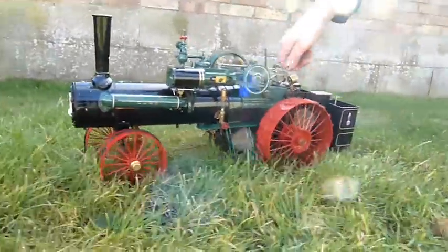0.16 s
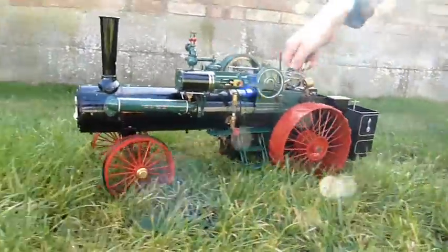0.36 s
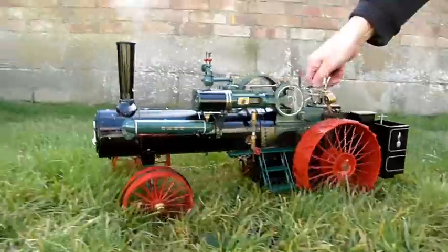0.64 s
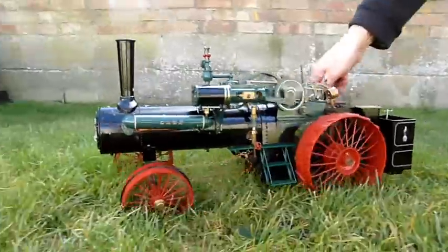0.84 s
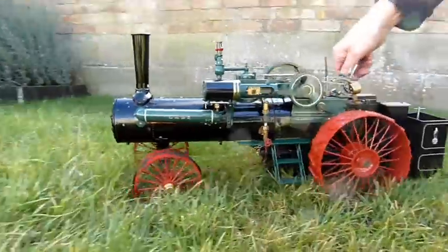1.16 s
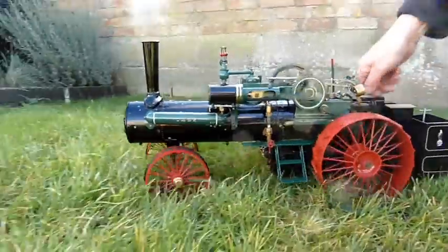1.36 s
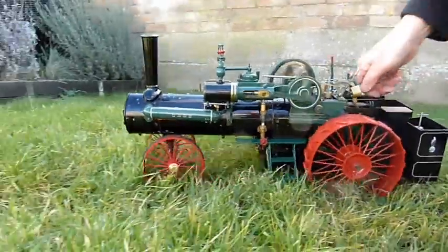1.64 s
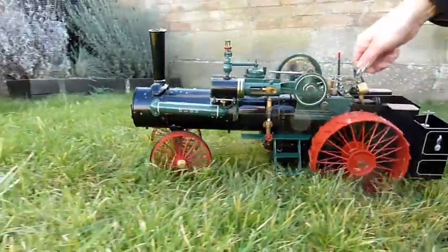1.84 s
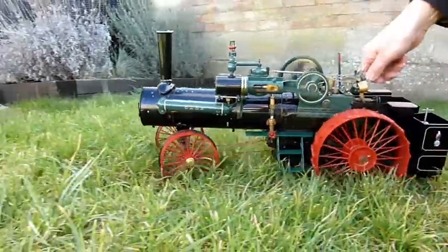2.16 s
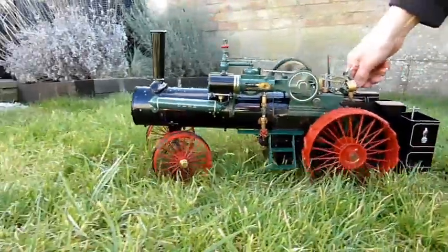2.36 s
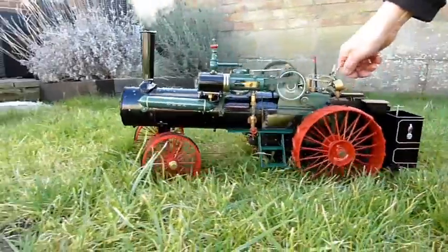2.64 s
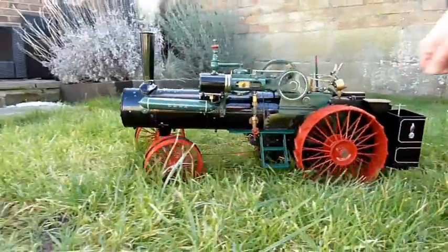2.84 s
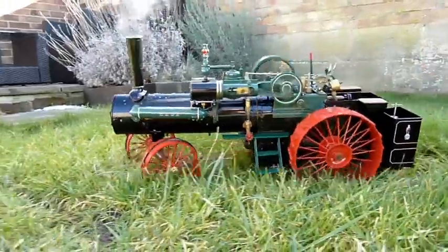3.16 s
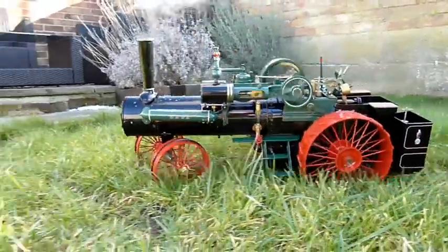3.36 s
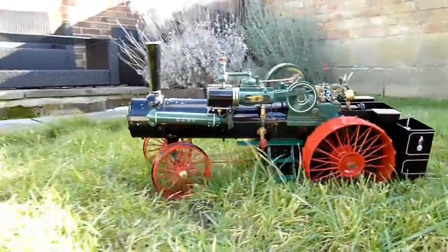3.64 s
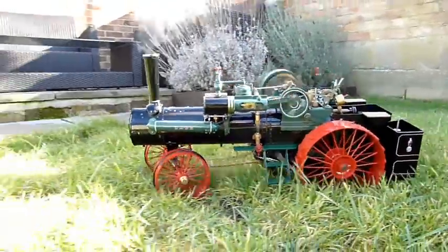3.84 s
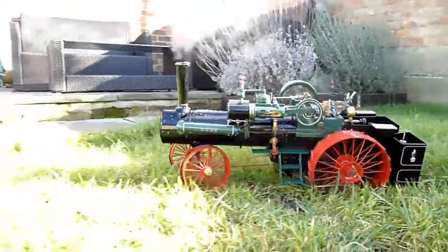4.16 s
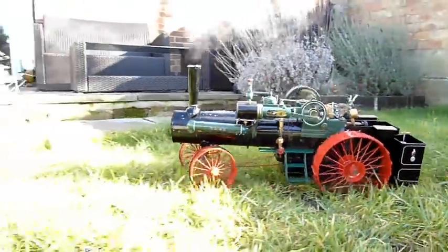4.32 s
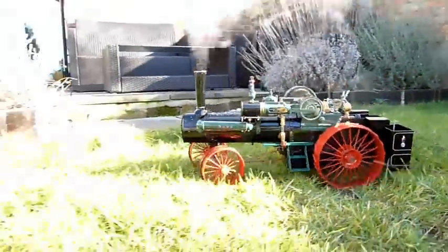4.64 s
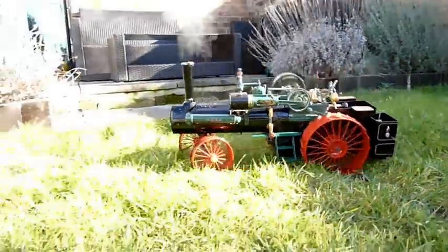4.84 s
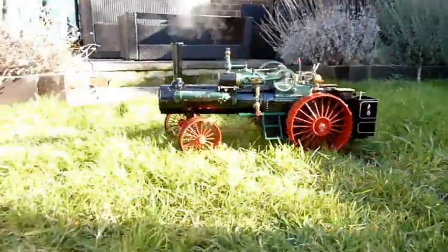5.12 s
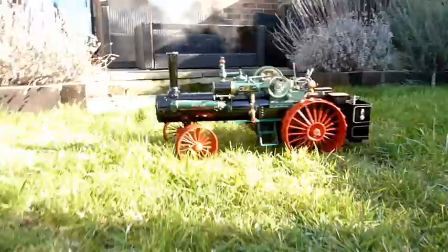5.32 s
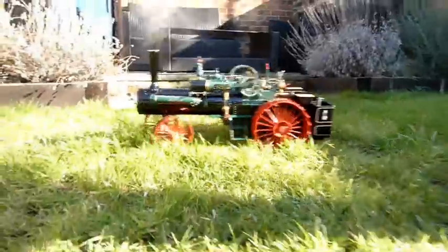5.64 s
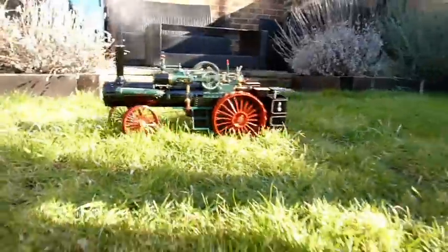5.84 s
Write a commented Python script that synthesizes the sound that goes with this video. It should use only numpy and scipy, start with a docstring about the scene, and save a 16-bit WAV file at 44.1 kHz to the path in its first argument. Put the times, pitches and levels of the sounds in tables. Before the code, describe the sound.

From 0 to 6 seconds a small model steam engine runs without pause on a lawn beside a wall. Its rapid, rasping chuffs begin at once, with a strong first beat, about sixteen to eighteen a second, dipping slightly around 0.3 seconds, then quickening to about twenty near 1.7 seconds. They ease briefly around 3.1 seconds and then stay near nineteen, slightly irregular. Alternate beats differ: one sharp, the next rounder and longer. Each is a bright steam burst with a hollow chimney tone, accompanied by tiny metallic knocks and loose gear rattle. A steady, fluttering burner roar and low rumble lie below, with thin leaking hiss. Very faint low thuds come near 1.1 to 1.4 and 5.4 seconds, a barely audible hum swells between 1.3 and 2.3, and a weak fuzzy whine drifts in and out. Close outdoor microphone, very little echo, limited treble; it stops mid-run.

```python
"""Rapid, rasping chuffs come first: a small single-cylinder steam engine rolls past on a lawn by a brick wall.
Each stroke blows a steam jet, noise gated by the valve, up a resonant chimney; the two cylinder ends differ.
Slack taken up in rods and valve gear knocks the frame into decaying modes, and gears rattle at random.
A burner roars steadily in the flue, as noise through resonances, over a low rumble.
Behind lie a thin hiss of leaking steam, a low hum that swells, soft thuds and a narrow whine."""
import sys
import numpy as np
from scipy import signal
from scipy.fft import rfft, irfft, next_fast_len
from scipy.io import wavfile
from scipy.ndimage import uniform_filter1d

SR = 44100
rng = np.random.default_rng(int(sys.argv[2]) if len(sys.argv) > 2 else 0)


def log_audio(samples):
    """Write samples as a 16-bit WAV file to the path given in sys.argv[1]."""
    # one column per channel
    frames = np.atleast_2d(samples).T
    # limit to full scale, then quantise
    limited = np.clip(frames, -1, 1)
    pcm = np.round(limited * 32767).astype(np.int16)
    wavfile.write(sys.argv[1], SR, pcm)


N = 264159
TIME = np.arange(N) / SR


def amp(db):
    """Level law: amplitude ratio of a level in dB."""
    return 10 ** (np.asarray(db) / 20)


def evened(x):
    """Power normalisation: scales a signal to unit RMS."""
    return x / np.sqrt(np.mean(x ** 2) + 1e-20)


def follow(rows):
    """Linear interpolation: the columns of a time table, one value a sample."""
    s, *columns = np.transpose(rows)
    return [np.interp(TIME, s, c) for c in columns]


def colour(x, points):
    """Spectral shaping: filters by a spectrum in dB, drawn on a log-frequency axis."""
    hz, db = np.transpose(points)
    size = next_fast_len(N, True)
    bins = np.fft.rfftfreq(size, 1 / SR)
    gain_db = np.interp(np.log(bins + 1), np.log(hz + 1), db, -90, -90)
    return irfft(rfft(x, size) * amp(gain_db), size)[:N]


def resonate(x, hz, width):
    """Heterodyne resonator: shifts the curve hz down to zero, smooths, and shifts back."""
    turn = np.exp(2j * np.pi * np.cumsum(hz * np.ones(N)) / SR)
    r = np.exp(-np.pi * width / SR)
    return 2 * (turn * signal.lfilter([1 - r], [1, -r], x / turn)).real


def flutter(span, depth_db):
    """Turbulent modulation: a gain that wanders over about span samples, depth_db RMS."""
    size = max(int(span), 2)
    smooth = uniform_filter1d(uniform_filter1d(rng.standard_normal(N), size), size)
    return amp(depth_db * evened(smooth))


SWELL_EDGE_S = 0.063


def swells(rows):
    """Amplitude envelope: soft-edged level of (start_s, length_s, level_db) rows."""
    total = 0
    for s, length, db in rows:
        to_edge = np.minimum(TIME - s, s + length - TIME)
        total = total + amp(db) * np.clip(to_edge / SWELL_EDGE_S, 0, 1)
    return total


# spectrum of steam leaking past the glands: frequency_hz [Hz], relative level_db [dB]
LEAK_SPECTRUM = [(1000, -22), (1300, 7), (2000, -12), (2400, 17), (4500, 5.5), (5300, 17.5), (6300, -17),
                 (7300, -21.5)]
LEAK_DB, LEAK_FLUTTER_DB = -48, 3.5


def leak():
    """Turbulent leakage: a thin hiss of coloured noise, steady but for a fine flutter."""
    noise = rng.standard_normal(N) * flutter(200, LEAK_FLUTTER_DB)
    return amp(LEAK_DB) * evened(colour(noise, LEAK_SPECTRUM))


# swells of the low hum: start_s [s], length_s [s], level_db [dB]
HUM_SWELLS = [(1.3, .26, -48), (1.62, 0.29, -46.5), (2.06, 0.26, -52)]
HUM_HZ = 49.7


def hum():
    """Amplitude modulation: a low pure tone swells three times, its level wavering."""
    tone = np.sqrt(2) * np.sin(2 * np.pi * HUM_HZ * TIME)  # unit RMS
    return flutter(1500, 1.7) * swells(HUM_SWELLS) * tone


# soft low thuds: start_s [s], length_s [s], level_db [dB]
THUD_SWELLS = [(1.1, 0.21, -44), (1.35, 0.11, -45), (5.38, 0.43, -47.5)]
THUD_HZ, THUD_WIDTH_HZ = 98.4, 26  # width of each of two resonators in series


def thuds():
    """Resonant filtering: low narrow-band noise under soft-edged envelopes."""
    once = resonate(rng.standard_normal(N), THUD_HZ, THUD_WIDTH_HZ)
    return swells(THUD_SWELLS) * evened(resonate(once, THUD_HZ, THUD_WIDTH_HZ))


# course of the thin whine: time_s [s], level_db [dB]
WHINE_COURSE = [(0.0, -62), (0.03, -48), (0.35, -42), (0.37, -53.5), (1.1, -43.5), (1.32, -58), (2.72, -45),
                (4.49, -60), (5.69, -46), (5.99, -53)]
WHINE_HZ, WHINE_WIDTH_HZ = 1066, 42  # width of each of two resonators in series


def whine():
    """Resonant filtering: noise narrowed to a slightly fuzzy tone that comes and goes."""
    once = resonate(rng.standard_normal(N), WHINE_HZ, WHINE_WIDTH_HZ)
    level_db, = follow(WHINE_COURSE)
    return amp(level_db) * evened(resonate(once, WHINE_HZ, WHINE_WIDTH_HZ))


# course of the burner: time_s [s], roar_db [dB], rumble_db [dB]
BURNER_COURSE = [(0, -33, -48), (.18, -33.5, -49), (.25, -31, -48.5), (.57, -29, -48), (.7, -33, -48),
                 (1.05, -31, -46.5), (1.13, -33, -43), (1.42, -32, -44.5), (1.5, -32, -47.5),
                 (2.4, -31.5, -48), (3.3, -32, -47.5), (3.7, -32.5, -48.5), (4.8, -31.5, -47),
                 (5.3, -32, -50), (5.42, -31, -47), (5.99, -32, -46.5)]
# spectrum of the roar: frequency_hz [Hz], relative level_db [dB]
ROAR_SPECTRUM = [(150, -18), (220, -4.5), (260, 3), (450, 1), (690, 2.5), (760, -1), (860, 0), (960, -18),
                 (1400, -13), (2500, -19), (4500, -32), (7000, -31)]
# flue resonances: frequency_hz [Hz], width_hz of each of two resonators [Hz], level_db against the roar [dB]
FLUE_MODES = [(326, 28, -20), (409, 71, -22.5), (579.4, 130, -9.5), (687, 29, -21), (802, 79, -20)]
# spectrum of the rumble: frequency_hz [Hz], relative level_db [dB]
RUMBLE_SPECTRUM = [(12, -32.5), (20, -17.5), (49, 3.5), (146, -1), (200, 0.5), (260, -46.5), (440, -120)]


def burner():
    """Combustion noise: a flickering flame excites the flue resonances; a low rumble lies under it."""
    roar_db, rumble_db = follow(BURNER_COURSE)
    flame = rng.standard_normal(N) * flutter(210, 1.58) * flutter(1700, 0.24)
    flue = np.zeros(N)
    for hz, width, db in FLUE_MODES:
        once = resonate(flame * flutter(3000, .8), hz, width)
        flue += amp(db) * evened(resonate(once, hz, width))
    roar = evened(evened(colour(flame, ROAR_SPECTRUM)) + flue)
    rumble = evened(colour(rng.standard_normal(N), RUMBLE_SPECTRUM) * flutter(2500, 0.9))
    return amp(roar_db) * roar + amp(rumble_db) * rumble


# usual of the two cylinder ends, outward then return, all relative:
# jet_db [dB], late_fade_db [dB], chimney_tone_db [dB], knock_db [dB]
CYLINDER_ENDS = [(1.38, -4, -0.2, -32), (-2.5, 2.5, -2, -32)]
# one row a chuff, outward and return in turn, against the usual of its end:
# start_s [s], jet_db [dB], late_fade_db [dB], knock_db [dB], smokebox_ring_db [dB]
STROKE_ROWS = [(-0.03, 4, -6.5, 4, 3.0), (0.0224, -1.0, -2, -6, 1), (0.077, 1, -1, -5, 1),
               (0.1296, 1, -2, 2, -2), (0.1917, -1, -7, -5, 4), (0.2544, -0.5, 3.5, 4.5, 1),
               (0.3197, 1.5, -4, 0.5, -1.5), (0.3845, 0.5, -3.5, 5, 0), (0.4421, 2.0, -7.5, -1, -1),
               (0.501, 0.5, -6, -2.0, 0), (0.5561, -0.5, 0.5, 1.0, -3), (0.6116, 2, -1.5, 2.0, -3),
               (0.664, 1.5, -2.5, 4.5, -4), (0.7206, 0.5, -0.5, 6.5, -0.5), (0.7751, 0, 5, -3, 2),
               (0.8308, -0.5, -3.5, 1, 1.5), (0.8846, 1.0, 0.0, 1.5, -1.0), (0.941, -2.0, 3.5, 5, -1),
               (0.9955, -0.5, -1.5, -0.5, 1), (1.054, -0.5, 2, 3.5, 4.5), (1.1066, 0.5, 10, -0.5, -4),
               (1.1602, -1.5, 3.5, 4, 1.0), (1.211, -1.5, 3, 0.5, 3), (1.266, 0.5, 2, 6, -2),
               (1.316, -0.5, 5.5, 2.5, 1), (1.3685, 0, -5, 6.5, 4), (1.422, 1, 3.5, -2.5, -5),
               (1.4762, 0.5, 1, 5.5, -0.5), (1.527, -1.0, -10.5, -1, -2), (1.5796, -0.5, 2.5, -1.5, 1.5),
               (1.6239, 2, 0, 4, -5), (1.6721, 0, -5.5, 3.5, 0.5), (1.7207, -0.5, 0.5, 2.5, -3),
               (1.7697, -1, 1.5, 4.0, -5), (1.8217, 0.5, -6.0, 3.5, 1.5), (1.8719, -0.5, 4.5, 5.5, 0),
               (1.9252, 0, 6, 5, -3), (1.9736, -2, 8, 3.0, 0.5), (2.0253, -3.5, 1, 3.5, 5.5),
               (2.0812, 1.5, -2.5, 0, 1), (2.1319, -0.5, 1, 2.5, 0.5), (2.1884, 1, -3, 2.0, -5),
               (2.2457, 1, -1.5, 3.5, -1.5), (2.2987, -0.5, 2.5, 3, -2), (2.3523, 1.5, -4.5, -3, 0),
               (2.4067, 0.5, -3.5, 4, -2), (2.4549, -1, -2.5, -2, 2), (2.5096, -0.5, -8.0, 6, 4),
               (2.5575, 3, 1, -2.5, -5), (2.6083, -0.5, 3, 4.5, 1), (2.656, -0.5, -0.5, -1, 6.5),
               (2.7082, -2.5, 6.5, 2.5, 3.5), (2.754, 1, -8, 4.5, 2), (2.8063, -1, 5, 5.5, 4.5),
               (2.8545, 2.5, 3, 6, 0.5), (2.909, 3, -4, 8.5, 0.5), (2.965, 0, 3, 3.5, -1.5),
               (3.0286, 1.0, 4, 5.5, 2), (3.0898, 0, -3.5, 1.5, 0.5), (3.1536, 0, -0.5, 6.5, 1.5),
               (3.2161, 0.0, 0, 2, 1.5), (3.276, 0, -8.5, 4, 1.5), (3.3354, 1.5, 3.5, 3.5, 1),
               (3.3922, 0, -0.5, 5, 1), (3.4463, 1.5, 1.5, 5, -1.0), (3.4947, -1.0, 4.0, 3.5, -2),
               (3.5491, 1.5, -4, 0, -1), (3.6028, 0, -4.5, 1, 3), (3.6519, 0, -2, 0.0, -0.5),
               (3.705, -1, 0.5, 3, -1.0), (3.7586, 0.5, 0.5, -3.5, 0.5), (3.8139, -2, -1, 2.5, 1),
               (3.8654, 0, -5, 1.5, 3), (3.919, -1, 0, 2.0, 5), (3.969, -1, 7, -4.5, -1),
               (4.02, -1.0, 1.5, 3.0, -0.5), (4.07, 0.5, 0.5, 1.5, 2.5), (4.123, 0.5, -7, 2, 1.5),
               (4.1742, 0.0, -3.5, -2, 0), (4.2264, 0, -6, 1, 2), (4.2763, -0.5, -2.5, -1.0, -0.0),
               (4.3311, -0.5, -1.5, -1, -2), (4.3835, 0, -4, -1, 4.5), (4.4356, 0.0, -0.5, 0, -2),
               (4.4876, 1.5, -4.5, -6.0, 0.5), (4.5363, -2, 4.5, 3.5, -4), (4.5922, -1.5, 5.5, -2.5, 0),
               (4.6505, -0.5, -1.5, 0.5, 1), (4.7077, -1, -7.5, -2, 2.5), (4.7643, -2.0, 4.5, 0, 1.5),
               (4.8213, -0.5, -3.5, 2.5, 2), (4.877, 0.5, 0.5, 4.5, -0.5), (4.9314, 0, 1, -2, 1),
               (4.9838, 1, -1, 4, 1.5), (5.0313, 0.5, -0.5, -5, 1), (5.0813, 1, -1.5, 4, 4.5),
               (5.1241, 2.5, -4.5, 2.5, -2.5), (5.1759, 2.5, -8.0, -5, 0.5), (5.2207, -1.5, 4.5, -3.0, 4),
               (5.2706, -0.5, 2.5, 2, 0), (5.3239, 0.5, 3.5, 0.5, -0.5), (5.3781, 0.5, 2.5, 3, -1),
               (5.4324, 1, -3.5, 5, -0.5), (5.4854, 1, 2, 3.0, -5), (5.5404, 2.5, -2, 0.5, -1.5),
               (5.5916, 0, 2, -0.5, 0), (5.6414, 0.5, 2.5, 2.5, -0.5), (5.695, 0, 6, 5, -2.5),
               (5.747, -0.5, 2.5, -5.0, 1.5), (5.7996, -0.5, 4, 6, -2.5), (5.8526, 2.5, -6.5, -3, -1),
               (5.9031, 0.5, 5, 3.5, 0), (5.952, -1.0, 7, 0, -1.0), (6.06, 0.0, 0.0, 0.0, 0.0)]


def strokes():
    """Double action: each stroke's start, its levels (usual of its end plus its own) and smokebox ring."""
    start, jet_db, fade_db, knock_db, ring_db = np.transpose(STROKE_ROWS)
    usual = np.transpose(CYLINDER_ENDS)[:, np.arange(len(start)) % 2]
    own = [jet_db, fade_db, np.zeros(len(start)), knock_db]
    return start, usual + own, ring_db


# slack taken up, one row a knock: end [0 outward, 1 return], share of the stroke [0 to 1],
# struck_hz [Hz], relative level_db [dB]
KNOCK_ROWS = [(0, 0.1, 2410, 1.5), (0, .125, 3630, -1), (0, .16, 964, 11), (0, .16, 1380, 0.5),
              (0, .27, 800, 3), (1, 0.0402, 2270, 3.5), (1, .035, 1220, 1.5), (1, 0.0684, 816, 7),
              (1, .18, 3420, -0.5), (1, .27, 1290, 3.5), (1, .29, 843, 4), (1, 0.27, 2286, -1),
              (0, .12, 1660, 0), (1, .2, 1665, -2), (0, .68, 2500, -9), (1, .77, 2440, -10),
              (1, .77, 4600, -6), (1, .06, 563, 5), (1, .93, 350, 9)]
# modes of frame and boiler shell: frequency_hz [Hz], relative level_db [dB], t60_s [s]
FRAME_MODES = [(346, -3.5, 0.017), (547, -3.5, 0.019), (840, -3, 0.029), (1070, -1.5, 0.01),
               (1283, -10, 0.026), (1416, -0.5, 0.012), (1646, -5, 0.038), (2362, -3, 0.011),
               (2630, -1, 0.0047), (3405, 0, 0.017), (4750, 2, .006)]
RATTLES_PER_S, RATTLE_SPREAD_DB = 160, 3  # gear teeth and loose pins, at random
RATTLE_HZ, RATTLE_DB = 2540, -37.5  # struck region; least level before spread and mode gains


def linkage():
    """Modal excitation: each knock rings the frame modes near the struck region; gears rattle between."""
    start, (*_, knock_db), _ = strokes()
    length = np.gradient(start)
    luck = rng.standard_normal((len(start), len(KNOCK_ROWS), 2 + len(FRAME_MODES)))
    t, out = np.arange(3000) / SR, np.zeros(N)
    spread_db = RATTLE_SPREAD_DB * np.minimum(rng.exponential(1, N + SR), 4)
    rattle = (rng.random(N + SR) < RATTLES_PER_S / SR) * amp(RATTLE_DB + spread_db)
    for m, (mode_hz, mode_db, t60) in enumerate(FRAME_MODES):
        rattle_reach_db = -12 * np.log2(mode_hz / RATTLE_HZ) ** 2
        clicks = rattle * rng.standard_normal(N + SR) * amp(rattle_reach_db)
        for k, (end, share, hz, db) in enumerate(KNOCK_ROWS):
            mine = slice(round(end), None, 2)
            when = start[mine] + length[mine] * (share + .015 * luck[mine, k, 0])
            reach_db = -30 * np.log2(mode_hz / hz) ** 2  # modes far from the struck region ring less
            scatter_db = 0.72 * luck[mine, k, 1] + 0.54 * luck[mine, k, 2 + m]
            size = amp(knock_db[mine] + db + reach_db + scatter_db)
            # knocks before the start wrap into the unused end
            np.add.at(clicks, np.round(when * SR).astype(int), size)
        decay = amp(mode_db - 60 * t / t60)
        ring = decay * np.cos(2 * np.pi * mode_hz * t) * np.minimum(t * mode_hz, 1)  # one-cycle onset
        out += signal.oaconvolve(clicks, ring)[:N]
    return amp(3.5) * out


# steam flow through a stroke, before each band's steepness:
# share of the stroke [0 to 1], outward_db [dB], return_db [dB]
STEAM_FLOW = [(0, -21, -14.5), (.045, -14, -13), (0.064, -3.5, -2), (.12, 1.5, 1.5), (.22, -2, 4.5),
              (0.332, -3.5, 3), (0.498, -4.5, 0.5), (0.681, -5.5, -2.5), (0.821, -15, -6),
              (0.929, -14.5, -15), (0.98, -22, -18)]
# spectrum of the jet: frequency_hz [Hz], relative level_db [dB]
JET_SPECTRUM = [(850, -13.5), (1300, -5.5), (2050, -9), (2350, -9), (2900, -3.5), (3250, -2), (3480, -3),
                (3750, -3.5), (4300, -8.5), (4800, -7), (5500, -2.5), (6200, -6), (6950, -17),
                (7300, -51.5)]
# smokebox resonances stirred by the jet, sinking as the engine rolls away:
# first_hz [Hz], last_hz [Hz], width_hz [Hz], relative level_db [dB]
SMOKEBOX_MODES = [(3377, 3365, 130, -6.5), (3577, 3555, 70, -6.5), (3885, 3880, 140, -12)]
# as the engine rolls past: time_s [s], chimney_hz [Hz], relative treble_db [dB], relative jet_db [dB],
# chimney_tone_db against the jet [dB]
HEADING_COURSE = [(0.0, 1685, 0, -29, -7), (.95, 1664, 0, -29, -9), (1.28, 1610, 1, -29, -1),
                  (1.88, 1666, 0.5, -29.5, -1), (2.55, 1636, 1.4, -29.5, -3), (3.12, 1590, 1, -31.5, -0.5),
                  (3.8, 1650, 1.5, -29, -5), (4.52, 1660, 1, -30, -2), (4.69, 1587, -1, -29, -3.5),
                  (5.1, 1638, 1.7, -30.5, -2.5), (5.51, 1638, -2.5, -28.5, -3),
                  (5.99, 1646, 0.5, -29.5, 0.5)]
VALVE_LEAD_S = 0.0022  # the port starts to open this long before the blast is heard
TONE_SCATTER_DB, COLOUR_SCATTER_DB = .8, .6  # RMS, stroke to stroke
SMOKEBOX_WANDER = .004  # RMS share of pitch, stroke to stroke
SPITS_PER_S, SPIT_DB, SPIT_SPREAD_DB = 700, 6, 2.5  # water drops in the jet, before gating
NOTCH_HZ, NOTCH_WIDTH_HZ, NOTCH_DEPTH = 3440, 110, 0.36  # dark line between two main resonances


def exhaust():
    """Jet noise: turbulence gated by the valve; higher jet bands follow the flow more steeply."""
    start, (jet_db, fade_db, tone_db, _), ring_db = strokes()
    count, modes = len(start), len(SMOKEBOX_MODES)
    body_db, fizz_db, *box_db = COLOUR_SCATTER_DB * rng.standard_normal((count, 2 + modes)).T
    tone_luck, *wander = rng.standard_normal((count, 1 + modes)).T

    crank = np.interp(TIME + VALVE_LEAD_S, start, np.arange(count))
    stroke = crank.astype(int)
    share = crank - stroke
    at, outward_db, return_db = np.transpose(STEAM_FLOW)
    flow_db = np.where(stroke % 2, np.interp(share, at, return_db), np.interp(share, at, outward_db))
    # a stroke may die early or hold on
    flow_db = flow_db + fade_db[stroke] * np.clip((share - .2) / 1.5, 0, 1)

    def gate(steepness, db):
        """Valve throttling: gain that follows the steam flow."""
        return uniform_filter1d(amp(db + steepness * flow_db), size=10)

    tone_hz, treble_db, level_db, pipe_db = follow(HEADING_COURSE)
    level_db = level_db + jet_db[stroke]
    pipe_db = pipe_db + (tone_db + TONE_SCATTER_DB * tone_luck)[stroke]

    low, high, top, pipe = rng.standard_normal((4, N)) * flutter(87, 0.63) * flutter(250, 1.0)
    spit_size = amp(SPIT_DB + SPIT_SPREAD_DB * np.minimum(rng.exponential(1, N), 4))
    spits = spit_size * (rng.random(N) < SPITS_PER_S / SR) * rng.choice([-1., 1.], N)
    low, high, top = low + spits, high + spits, top + spits

    jet = np.array(JET_SPECTRUM)
    jet_hz = jet[:, 0]
    body = colour(low * gate(0.74, level_db + body_db[stroke]), jet[jet_hz < 4500])
    fizz_gate = gate(1.33, level_db + treble_db + fizz_db[stroke])
    fizz = colour(high * fizz_gate, jet[(jet_hz > 4200) & (jet_hz < 6500)])
    edge = colour(top * gate(1.5, level_db + treble_db), jet[jet_hz > 6000])

    box = np.zeros(N)
    for (hz, last_hz, width, db), off, own_db in zip(SMOKEBOX_MODES, wander, box_db):
        stirred = low * gate(0.99, level_db + (ring_db + own_db)[stroke])
        pitch_hz = np.linspace(hz, last_hz, N) * (1 + SMOKEBOX_WANDER * off[stroke])
        box += amp(db) * np.sqrt(SR / width) * resonate(stirred, pitch_hz, width)

    tone = resonate(pipe * gate(0.9, level_db + pipe_db), tone_hz, 95)
    tone = resonate(tone, tone_hz, 370)
    blast = amp(9.5) * (body + fizz + edge) + amp(-6.5) * box
    notched = blast - NOTCH_DEPTH * resonate(blast, NOTCH_HZ, NOTCH_WIDTH_HZ)
    return notched + amp(20.0) * tone


def wall(x, t60):
    """Diffuse reflection: short scattered echoes from wall and paving, decaying 60 dB in t60 s."""
    taps = np.zeros(4000)
    at = np.arange(100, 3980, 20) + rng.integers(0, 20, 194)
    taps[at] = rng.choice([-1., 1.], 194) * amp(-60 * at / SR / t60)
    return signal.oaconvolve(x, taps / np.linalg.norm(taps))[:N]


def scene():
    """Superposition: the engine with its echoes, over leak, burner, hum, thuds and whine."""
    engine = exhaust() + linkage()
    engine = engine + amp(-22) * wall(engine, .1)
    return (engine + leak() + burner() + hum() + thuds() + whine())[None]


EDGE_HZ = 7350


def record(dry):
    """Band limitation: a linear-phase low-pass filter removes the sound above EDGE_HZ."""
    lowpass = signal.firwin(511, EDGE_HZ, window=("kaiser", 9), fs=SR)
    return signal.oaconvolve(dry, lowpass[None], "same")


dry = scene()
out = record(dry)
log_audio(out)
```